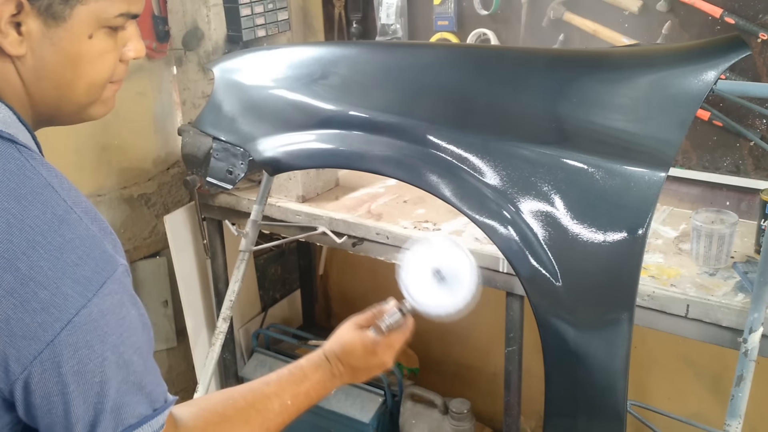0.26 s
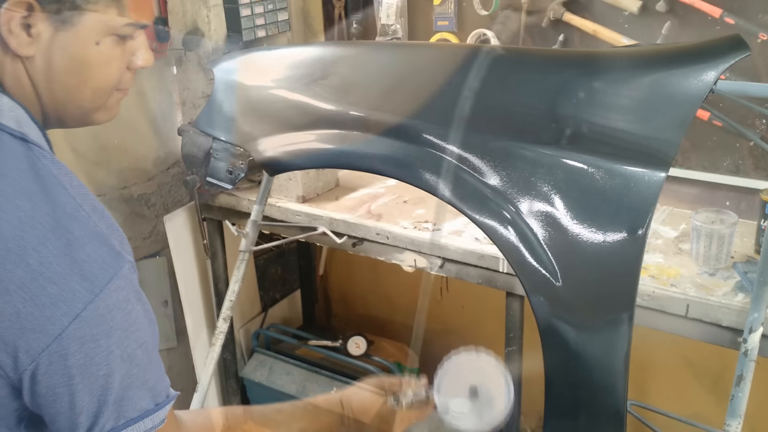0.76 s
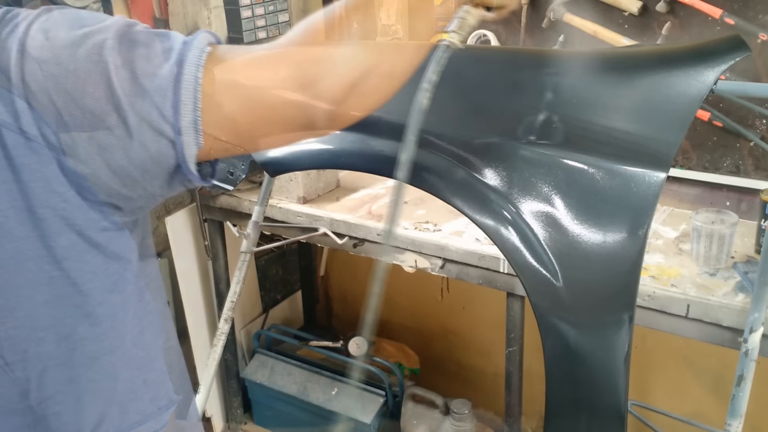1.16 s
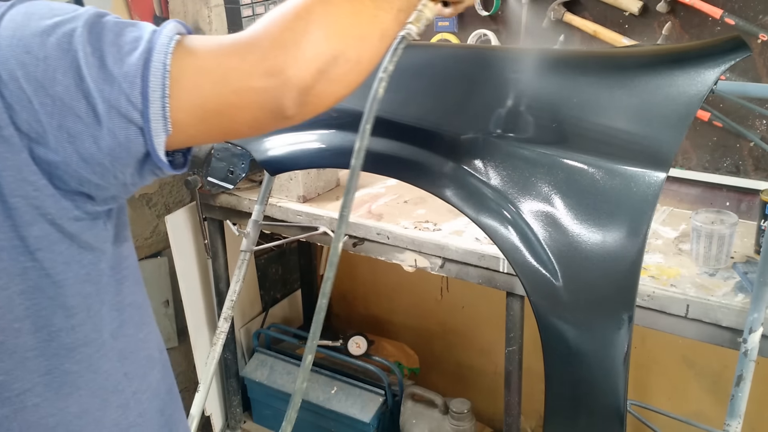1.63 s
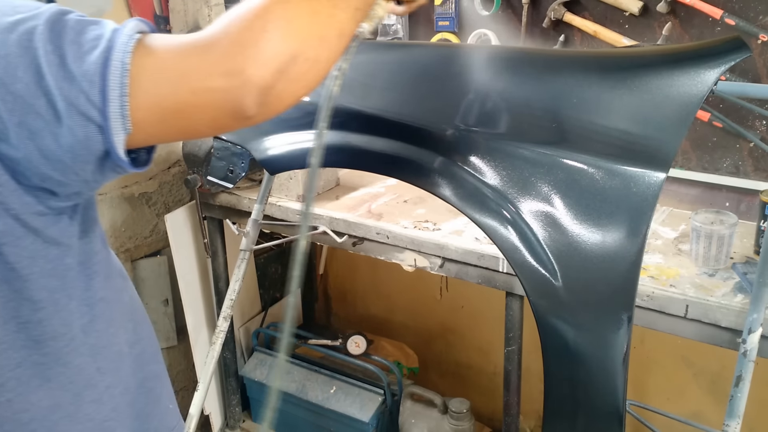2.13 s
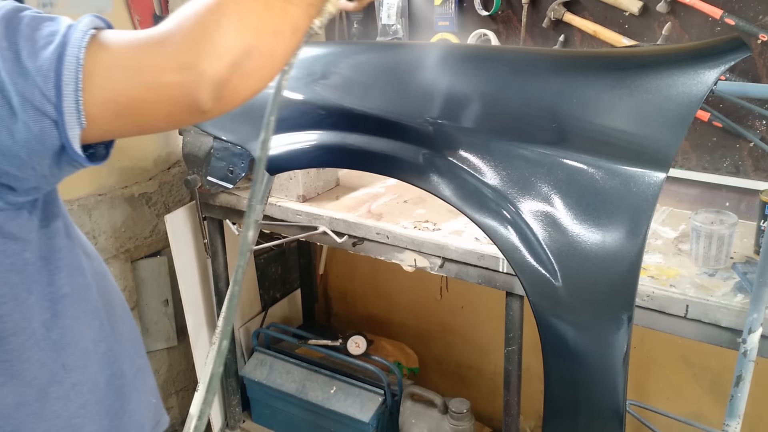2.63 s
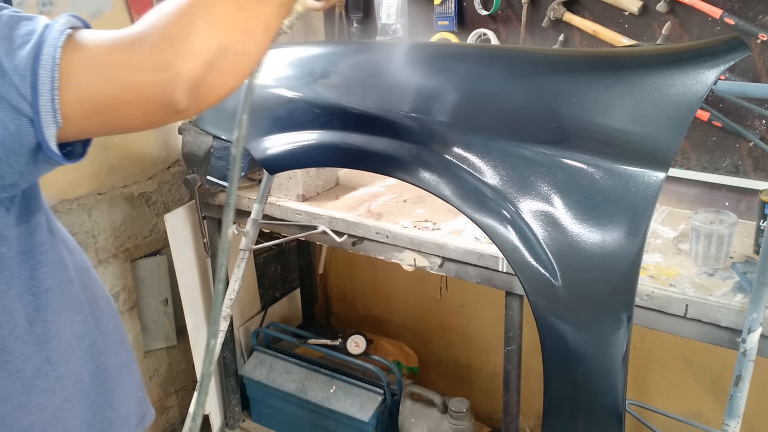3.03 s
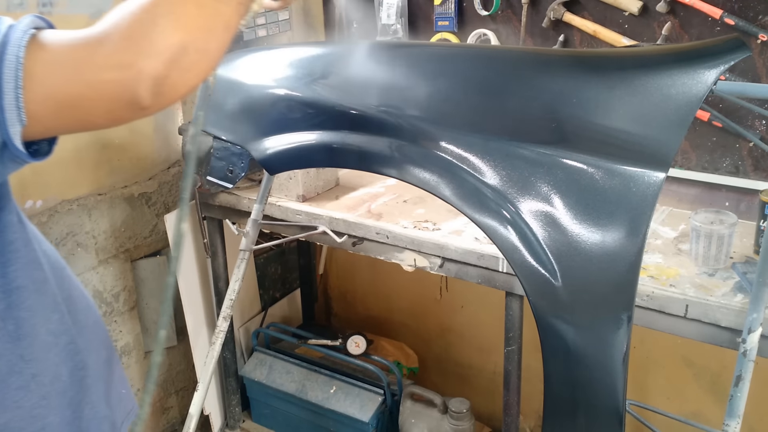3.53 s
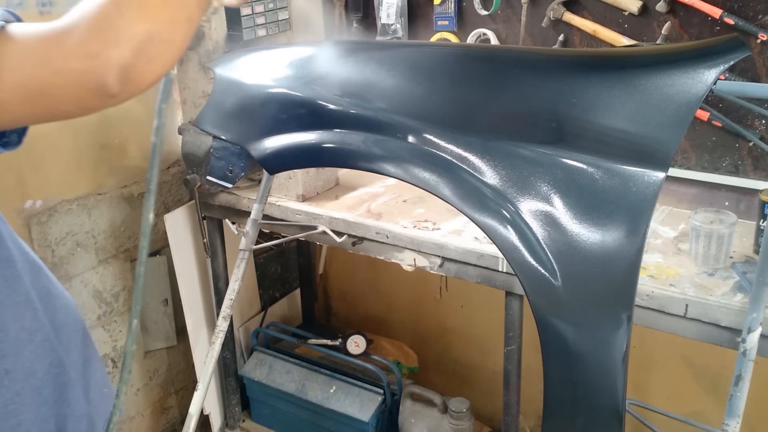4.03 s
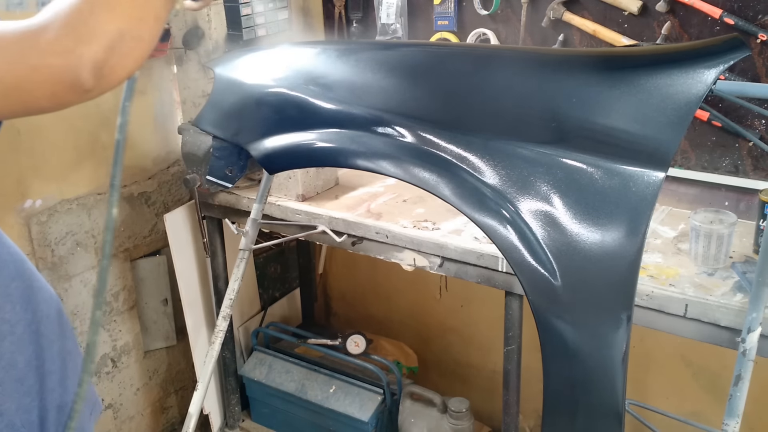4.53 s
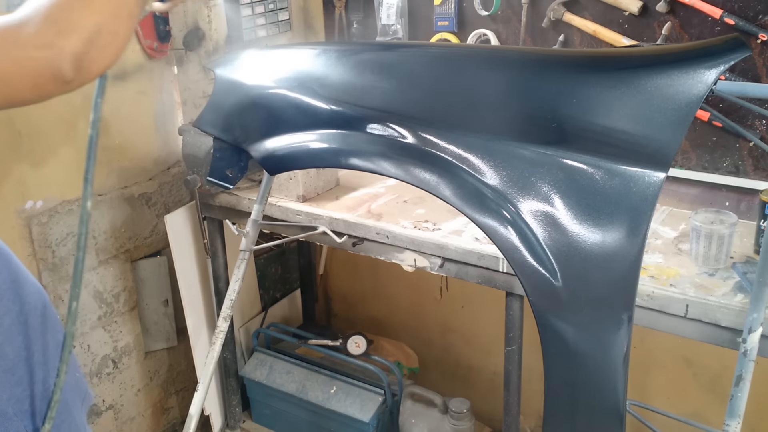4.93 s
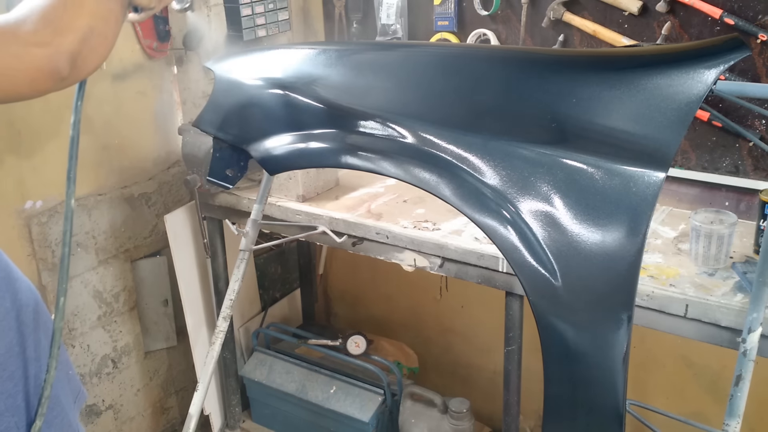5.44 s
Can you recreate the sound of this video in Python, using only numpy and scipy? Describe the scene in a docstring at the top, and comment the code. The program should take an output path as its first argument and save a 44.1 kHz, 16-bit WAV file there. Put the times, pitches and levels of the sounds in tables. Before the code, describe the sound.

The sound is already running at 0 s and continues to the end at about 5.6 s. A small piston compressor makes a very fast, even chug, about 29 beats per second, fused into a buzzing drone with hollow mid-range metallic rattle, ringing housing, a faint unsteady motor whine and thin valve ticks. Short rough spells and tiny dips break its evenness, notably near 1.3, 2.3, 2.8, 3.4 and 5 s. Soft low air rumble is strongest in the first second. Around 1 s the knock briefly fades and the lowest hum swells. From 1.2 to 2.5 s the spray gun's dense bright hiss is most forward, its colour sliding downward as it moves from right to left; from 3 s it recedes, leaving steady airy room hiss and compressor. Phone stereo in a workshop: wide, hollow, slightly phasey treble, steeply cut at the top.

```python
"""A small piston compressor chugs in a workshop while a spray gun hisses, heard through a phone's two ports.
From the start crank-locked partials knock, loose parts rattle, valves tick and the chug turns rough by spells;
stray air rumbles early on. Near 1 s the knock fades for a moment and the lowest partials swell.
The gun's filtered noise then comes forward, sweeps from right to left along a steel panel and falls away,
over steady room hiss. One port is mixed in late and inverted, so the treble stays wide and hollow."""
import sys
import numpy as np
from scipy import signal
from scipy.fft import rfft, irfft
from scipy.io import wavfile
from scipy.ndimage import uniform_filter1d

SR = 44100
rng = np.random.default_rng(int(sys.argv[2]) if len(sys.argv) > 2 else 0)


def digitize_waveform(pressure):
    """Quantize a signal to 16-bit integers and store it at the path in sys.argv[1].

    Rows of a 2-D input are taken as channels; values are limited to [-1, 1].
    """
    field = np.atleast_2d(pressure).T
    bounded = np.clip(field, -1, 1)
    quanta = np.round(bounded * 32767).astype(np.int16)
    wavfile.write(sys.argv[1], SR, quanta)


N = 250929
TIME = np.arange(N) / SR
FREQ = np.maximum(np.arange(N // 2 + 1) * SR / N, 1)

# Partials of the pump's knock: multiple of crank speed, relative level_db, left_minus_right_db, side_minus_mid_db
PUMP_PARTIALS = [(4, -42.5, 6, -4), (5, -36.6, 1, -4), (6, -40.9, 1, -8), (7, -48.7, -6, 4),
                 (8, -38.0, 2, -15), (9, -43.1, 3, -7), (10, -38.6, 5, 1), (11, -40.9, 6, -7),
                 (12, -32.4, 8, -6), (13, -29, -3, -17), (14, -29.4, 0, 5), (15, -33.8, 7, -2),
                 (16, -38.7, 4, -10), (17, -36.7, 7, 5), (18, -35.3, 4, -5), (19, -36.9, 2, -3),
                 (20, -41.8, -5, -6), (21, -39.7, 1, -7), (22, -44.6, 0, -7), (23, -39.2, -1, -6),
                 (24, -31.3, 6, -9), (25, -34.2, 5, -14), (26, -40, -4, -14), (27, -46.4, 3, -10),
                 (28, -38.4, 0, -22), (29, -38.4, 3, -17), (30, -49.0, 2, -11), (31, -41.8, 2, -10),
                 (32, -39.6, 5, -14), (33, -46.1, 5, -14), (36, -44.1, -2, -16), (37, -36.5, 0, -21),
                 (38, -43.0, 3, -14), (39, -44.4, 3, -17), (41, -51.5, 0, -14), (47, -50, 0, -21),
                 (54, -52.5, 1, -14)]
# Where in a turn each octave of the knock peaks: lowest_multiple, highest_multiple, peak_turns
KNOCK_PEAKS = [(4, 10, .17), (11, 20, .93), (21, 33, .03), (34, 60, .1)]
# Whine of the electric motor: pitch_hz, relative level_db
MOTOR_WHINE = [(748.7, -40.5), (1497.4, -47)]
# Spectrum of the loose rattle: pitch_hz, relative density_db
RATTLE_SPECTRUM = [(90, -29), (130, -32), (200, -19), (290, 3.5), (350, -4), (480, 8), (565, 10),
                   (630, 0.5), (740, -3.5), (900, -3), (1200, -6), (1600, -6), (2000, -4), (2500, -9.5),
                   (4000, -54)]
# Resonances of the housing: pitch_hz, width_hz, relative level_db
HOUSING_MODES = [(366, 26, -5.5), (719, 20.4, 5.5), (1044, 14, 1), (1495, 39, -2), (1564, 42, -6),
                 (1680, 17.5, -2)]
# Resonances of the valves: pitch_hz, width_hz, relative level_db
VALVE_MODES = [(3290, 70, 0), (3760, 200, 0), (4000, 60, -3), (4225, 45, 3), (4310, 40, -2), (5000, 75, 3),
               (5170, 55, 4.5)]
# Moments when the hum swells: centre_s, width_s, level_db
HUM_LIFTS = [(.7, 0.02, 4), (1.24, .16, 4)]
# Spells when the even chug turns rough: centre_s, width_s, roughness (0-1)
ROUGH_MOMENTS = [(.01, .04, .55), (.16, .045, .7), (.72, .06, .65), (.88, .06, .45), (1.29, .045, .8),
                 (1.46, .04, .75), (1.64, .07, .5), (2.07, .035, .35), (2.33, .08, 1), (2.66, .03, .7),
                 (2.85, .08, .7), (3.19, .06, .55), (3.42, .045, .8), (4.19, .055, .65), (4.57, .06, .65),
                 (4.76, .035, .35), (4.95, .055, 1), (5.29, .055, .85), (5.62, .07, .9)]
# Brief dips of the pump's sound: centre_s, width_s, level_db before each layer's share
PUMP_DIPS = [(.18, 0.018, -2), (0.609, 0.026, -3), (.77, 0.021, -0.5), (1.74, 0.033, -3.2),
             (2.3, 0.023, -3.5), (2.76, 0.036, -5.5), (3.21, 0.015, -3.5), (3.44, 0.013, -1),
             (3.84, 0.019, -2.5), (4.57, 0.026, -3), (5.03, 0.025, -1.5), (5.27, 0.024, -4.5),
             (5.58, 0.035, -2)]
# Direct hiss of the nozzle: pitch_hz, relative density_db
NOZZLE_SPECTRUM = [(2900, -30), (3300, -9), (4000, -8), (5500, -2.5), (7000, -2.4), (8400, 1), (9600, .6),
                   (10800, -1.7), (12500, -.6), (14000, -.4), (15300, -2.1), (17000, -30)]
# Direct hiss as the gun is lifted into the open, then swept away: start_s, relative level_db
NOZZLE_EXPOSURE = [(0, -9.5), (.6, -5.2), (1.2, 2.5), (1.8, 2.9), (2.4, 3), (3, .7), (3.6, -2.5), (4.4, -7),
                   (5.6, -14)]
# The gun's pass from right to left: start_s, right_port_lag_s
GUN_SWEEP = [(1.2, -.00009), (1.7, -.000072), (2.4, -.000043), (3, -.000023), (4.6, .000025), (5.6, .00006)]
# Hiss of the jet in the room: pitch_hz, relative density_db
ROOM_HISS_SPECTRUM = [(600, -1), (1500, -1.5), (2200, -2.7), (2550, -.6), (3050, -1.2), (4500, -.3),
                      (5500, -.4), (6400, 1.9), (7500, 1.2), (8200, 1.7), (9500, -.5), (10900, -1.7),
                      (12000, -1.2), (13300, -1.5), (15500, -2.9)]
# The left port gets more of the room's short waves: pitch_hz, left_minus_right_db
ROOM_HISS_BALANCE = [(3000, 0), (5000, .2), (6400, 1.3), (7600, 3.1), (8600, 3), (10900, .9), (12000, 3.2),
                     (13500, 4.6), (15300, 2.5)]
# Strength of the stray air on the ports: start_s, relative level_db
DRAUGHT_STRENGTH = [(0, -33), (.4, -24), (.85, -26), (1.2, -34), (1.75, -51), (2.25, -36), (3, -33),
                    (3.6, -39), (4.2, -32), (4.6, -33), (5.68, -44)]
# Spectrum of its rumble: pitch_hz, relative density_db
RUMBLE_SPECTRUM = [(5, -8), (14, 6), (28, 10.5), (39, 0), (58, 0.5), (90, 0), (140, -22), (300, -77)]
# Likeness of the two ports before the comb: pitch_hz, relative likeness
PORT_LIKENESS = [(1900, .9), (2300, 1.), (3000, 1.), (3950, .87), (5000, .66), (5400, .85), (5800, .58),
                 (6700, .53), (8100, .5), (9400, .4), (10800, .3), (12200, .2), (15000, .3)]

CRANK_HZ = 28.884
HUM_DB, KNOCK_DB, RATTLE_DB = 0.5, 1.6, 4.5  # gain offsets between the dips
HUM_DIP_SHARE, RATTLE_DIP_SHARE = 0.28, 0.3  # of each dip's depth
RATTLE_FLICKER_DB, RATTLE_FLICKER_RATE = 1.5, 9  # spread, changes per s
ROUGH_LOSS_DB = -1.5  # what the hum and knock lose at full roughness
HUM_WAVER, ROUGH_WAVER = .04, .38  # depth in steady running, depth added at full roughness
FADE_S, FADE_WIDTH_S, FADE_DB = 1.03, 0.089, -6  # the knock fades for a moment
# tilt among the partials: the lowest swell while the higher ones sink
BOOM_S, BOOM_WIDTH_S, BOOM_TILT_DB = 1.1, 0.28, 4
SLIP_S_PER_DB, SLIP_WIDTH_S = .00011, .05  # timing slip of the crank at each dip
# low clatter: gain in steady running, its rise at full roughness, and its upper edge
CALM_DB, FLARE_DB, FLARE_TOP_HZ = -6.5, 10.5, 1150
NOZZLE_DB, ROOM_HISS_DB = -27.4, -23  # rms, before exposure and flutter
# a broad peak in the direct hiss sinks during the pass; its pitch is given at mid-pass
MID_PASS_S, PEAK_HZ, PEAK_SAG_HZ_PER_S, PEAK_WIDTH_HZ, PEAK_DB = 2, 8480, 950, 610, 3
# right port: share of the left fed in late and inverted, treble loss per 10 kHz above 3 kHz, rise over time
CROSSFEED, RIGHT_SHADE_DB, RIGHT_RISE_DB_PER_S = .45, -5, .85
GUST_DB, GUST_RATE = -4, 4.94  # spread, changes per s
PORT_LAG_S, TOP_HZ = .000373, 15500


def compressor(turns, like):
    """Sum of hum, motor, rattle, housing and valves; all but the valves follow the pump's changing levels."""
    hum_db, knock_db, rattle_db = pump_levels()
    # no two strokes are quite equally hard
    force = undb(.4 * walk(CRANK_HZ))
    knocking = force * hum(turns, hum_db, knock_db, rattle_db)
    whine = motor() * undb(knock_db)
    clatter = rattle(turns, like) * undb(rattle_db)
    clatter += housing(like) * undb(0.5 * knock_db + 0.47 * rattle_db)
    return knocking + whine + flare(clatter) + valves(turns, like)


def hum(turns, hum_db, knock_db, rattle_db):
    """Crank-locked partials make the repeating knock, each with its own place between the ports."""
    orders, dbs = np.transpose(PUMP_PARTIALS)[:2]
    orders = np.round(orders).astype(int)
    phases = knock_phases(orders, undb(dbs))
    tilt_db = BOOM_TILT_DB * bell(BOOM_S, BOOM_WIDTH_S)
    waver = churn()
    out = np.zeros((2, N))
    for order, phase, (_, db, left_db, side_db) in zip(orders, phases, PUMP_PARTIALS):
        shade_db = hum_db if order < 21 else knock_db if order < 42 else rattle_db
        reach = min(order / 12, 1) ** 2  # the lowest partials stay steadier
        gain = undb(db + reach * shade_db + (0.5 - reach) * tilt_db)
        tone = np.exp(1j * (2 * np.pi * order * turns + phase))
        line = tone * wavering(reach * waver, rate=20) * gain
        # opposite phase turns set how much side the partial has
        spread = np.exp(np.array([[1j], [-1j]]) * np.arctan(undb(side_db)))
        ports = pan(left_db) * spread
        ports = ports / np.sqrt(np.mean(np.abs(ports) ** 2))
        out += np.sqrt(2) * (ports * line).real
    return out


def knock_phases(orders, gains, size=512, count=5):
    """The room scatters the partials' phases, yet each octave still swells once a turn."""
    phases = 2 * np.pi * rng.random(len(orders))
    for lowest, highest, peak in KNOCK_PEAKS:
        shape = stroke(np.arange(size) / size, peak, depth_db=3)
        own = (orders >= lowest) & (orders <= highest)
        lines = np.zeros(size, complex)
        # shape the cycle's loudness, keep only the new phases, repeat
        for _ in range(count):
            lines[orders[own]] = gains[own] * np.exp(1j * phases[own])
            cycle = np.fft.ifft(lines)
            rounded = shape * cycle / np.abs(cycle) ** .7
            phases[own] = np.angle(np.fft.fft(rounded)[orders[own]])
    return phases


def motor(waver=0.72, waver_rate=14):
    """The motor whines unsteadily, out of step with the crank, and beats against its partials."""
    whine = np.zeros(N)
    for hz, db in MOTOR_WHINE:
        tone = np.exp(2j * np.pi * hz * TIME) * wavering(waver, waver_rate)
        whine += level(tone.real, db)
    return whine


def rattle(turns, like):
    """Loose parts make shaped noise that swells once a turn."""
    loose = port_noise(undb(over_hz(RATTLE_SPECTRUM)), like)
    return level(loose * stroke(turns, peak=0.54, depth_db=1.0), db=-33.3)


def housing(like):
    """Noise rings the resonances of the housing."""
    return level(port_noise(ringing(HOUSING_MODES), like), db=-34.0)


def flare(clatter):
    """The low part of the clatter lies under the hum and flares up in rough spells; the top stays as it is."""
    lows = irfft(rfft(clatter) / (1 + (FREQ / FLARE_TOP_HZ) ** 10), N)
    return clatter - lows + lows * undb(CALM_DB + FLARE_DB * unrest())


def valves(turns, like):
    """The valves snap shut once a turn; air keeps them ringing in between."""
    snap = np.exp(-((turns - .91) % 1) / .08)
    return level(port_noise(ringing(VALVE_MODES), like) * (1 + 0.24 * snap), db=-31.5)


def crank_turns():
    """The flywheel keeps the crank nearly steady; around each dip the beat falls behind, then runs ahead."""
    ahead_s = np.zeros(N)
    for centre_s, _, db in PUMP_DIPS:
        swing = (TIME - centre_s) / SLIP_WIDTH_S * bell(centre_s, SLIP_WIDTH_S)
        ahead_s += -db * SLIP_S_PER_DB * swing
    speed_hz = CRANK_HZ + .02 * walk(3)
    return np.cumsum(speed_hz) / SR + CRANK_HZ * ahead_s


def pump_levels():
    """Gains in dB of hum, knock and rattle: all dip together, hum and knock yield to roughness, the knock fades once."""
    dip_db = bells(PUMP_DIPS)
    rough_db = ROUGH_LOSS_DB * unrest()
    flicker_db = RATTLE_FLICKER_DB * walk(RATTLE_FLICKER_RATE)
    hum_db = HUM_DB + HUM_DIP_SHARE * dip_db + bells(HUM_LIFTS) + rough_db
    knock_db = KNOCK_DB + dip_db + FADE_DB * bell(FADE_S, FADE_WIDTH_S) + rough_db
    rattle_db = RATTLE_DB + RATTLE_DIP_SHARE * dip_db + flicker_db
    return hum_db, knock_db, rattle_db


def churn():
    """How much the partials waver: hardly at all in steady running, strongly in a rough spell."""
    return HUM_WAVER + ROUGH_WAVER * unrest()


def unrest():
    """How rough the pump sounds: near 0 in steady running, up to about 1 in a rough spell."""
    return bells(ROUGH_MOMENTS)


def stroke(turns, peak, depth_db):
    """Gain round one turn, a cosine in dB that is greatest at the peak."""
    return undb(depth_db * np.cos(2 * np.pi * (turns - peak)))


def spray_gun(like, flutter_db=0.59):
    """A turbulent jet, direct and by way of the room; the paint feeds a little unevenly."""
    return (direct_hiss() + room_hiss(like)) * undb(flutter_db * walk(42))


def direct_hiss():
    """The nozzle heard directly: along the panel its peak sinks and the lag between the ports slides the colour."""
    noise = port_noise(undb(over_hz(NOZZLE_SPECTRUM)), 0)[0]
    hz, s, jet = signal.stft(noise, SR, nperseg=512)
    hz, since_s = hz[:, None], s - MID_PASS_S

    def late(lag_s):
        """A delay, as a phase turn at each frequency."""
        return np.exp(-2j * np.pi * hz * lag_s)

    peak_hz = PEAK_HZ - PEAK_SAG_HZ_PER_S * since_s
    left = jet * undb(PEAK_DB * bell(peak_hz, PEAK_WIDTH_HZ, at=hz))
    shade_db = RIGHT_SHADE_DB * np.clip((hz - 3000) / 10000, 0, None)
    shade_db = shade_db + RIGHT_RISE_DB_PER_S * since_s
    comb = late(curve(GUN_SWEEP, at=s)) - CROSSFEED * late(PORT_LAG_S)
    right = left * comb * undb(shade_db)
    hiss = signal.istft(np.array([left, right]), SR, nperseg=512)[1][:, :N]
    return level(hiss, NOZZLE_DB) * undb(curve(NOZZLE_EXPOSURE))


def room_hiss(like):
    """The jet's hiss after many reflections: the same wherever the gun is."""
    jet = rfft(port_noise(undb(over_hz(ROOM_HISS_SPECTRUM)), like))
    return level(irfft(jet * pan(over_hz(ROOM_HISS_BALANCE)), N), ROOM_HISS_DB)


def draught(gain_db=3.0):
    """Gusts of stray air push the two ports in nearly opposite senses."""
    strength_db = curve(DRAUGHT_STRENGTH) + GUST_DB * walk(GUST_RATE) + gain_db
    return port_noise(undb(over_hz(RUMBLE_SPECTRUM)), -.96) * undb(strength_db)


def port_likeness(from_left=0.15, low_like=0.75):
    """A late, inverted mix makes the ports agree and cancel by turns up the treble; the low mids are more alike."""
    turn = 2 * np.pi * FREQ * PORT_LAG_S
    lead = from_left * np.clip((FREQ - 5000) / 2500, 0, 1)
    comb = np.clip(1.12 * over_hz(PORT_LIKENESS) * np.cos(turn), -.99, .9998)
    low = np.clip((1500 - FREQ) / 300, 0, 1)
    return low * low_like + (1 - low) * (1j * lead * np.sin(turn) - comb)


def port_noise(gain, like):
    """Stereo noise with this gain and this complex likeness of right to left at each frequency."""
    left, other = rfft(rng.standard_normal((2, N)))
    right = like * left + np.sqrt(np.maximum(1 - np.abs(like) ** 2, 0)) * other
    return level(irfft(np.array([left, right]) * gain, N), 0)


def pan(left_db):
    """Gains of the two channels, from left minus right in dB."""
    return undb(np.array([[1], [-1]]) * left_db / 2)


def ringing(modes):
    """Gain of a few resonances side by side."""
    power = 0
    for hz, width, db in modes:
        power = power + undb(2 * db) / (1 + ((FREQ - hz) / width) ** 2) ** 2
    return np.sqrt(power)


def wavering(depth, rate):
    """Complex gain of near-steady mean power that wanders in level and phase."""
    return (1 + depth * (walk(rate) + 1j * walk(rate))) / np.sqrt(1 + 2 * depth ** 2)


def walk(rate):
    """Smooth chance that changes about rate times a second; spread near 1."""
    coarse = uniform_filter1d(np.repeat(rng.standard_normal(320), 8), 8)
    return 1.2 * np.interp(TIME * rate, np.arange(len(coarse)) / 8, coarse)


def bell(centre, width, at=TIME):
    """A smooth rise to 1 and fall back."""
    return np.exp(-.5 * ((at - centre) / width) ** 2)


def bells(table):
    """Sum of bells in time, each scaled by its last column."""
    return sum(amount * bell(centre_s, width_s) for centre_s, width_s, amount in table)


def curve(table, at=TIME):
    """Points joined by straight lines in time."""
    s, value = np.transpose(table)
    return np.interp(at, s, value)


def over_hz(points):
    """Points joined on a log-frequency axis."""
    hz, value = np.transpose(points)
    return np.interp(np.log(FREQ), np.log(hz), value)


def level(x, db):
    """Set the rms level."""
    return x * undb(db) / np.sqrt(np.mean(x ** 2))


def undb(db):
    """Decibels to gain."""
    return 10 ** (np.asarray(db) / 20)


def scene():
    """Compressor, gun and draught at the two ports."""
    like, turns = port_likeness(), crank_turns()
    # every stroke lifts the air pressure, and so the hiss, a little
    pressure = stroke(turns, peak=.88, depth_db=.5)
    return compressor(turns, like) + pressure * spray_gun(like) + draught()


def record(dry):
    """The phone cuts the top steeply."""
    return signal.sosfilt(signal.ellip(12, .1, 80, TOP_HZ, fs=SR, output="sos"), dry)


dry = scene()
out = record(dry)
digitize_waveform(out)
```